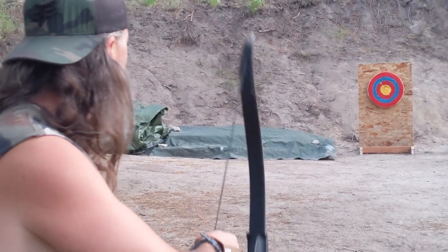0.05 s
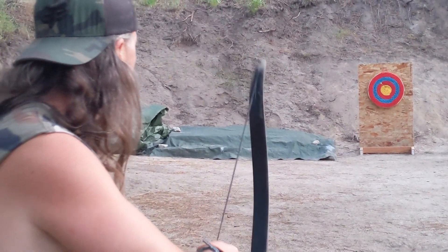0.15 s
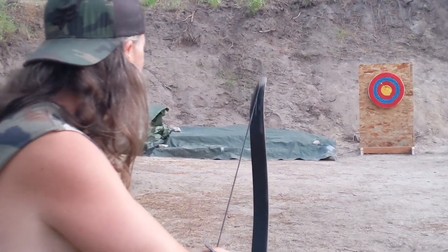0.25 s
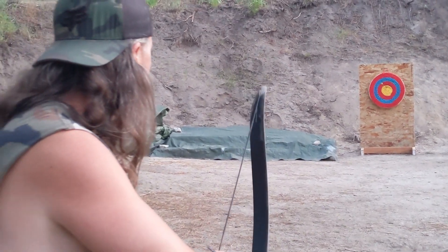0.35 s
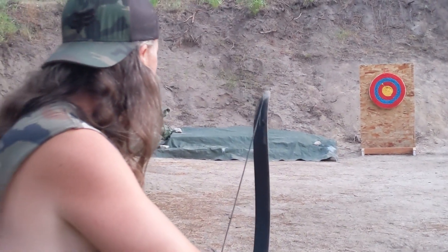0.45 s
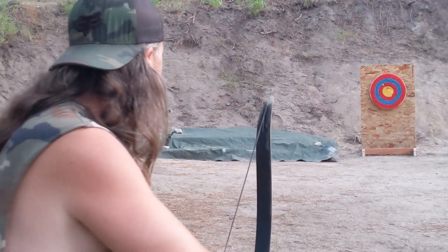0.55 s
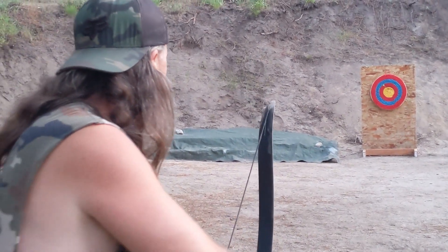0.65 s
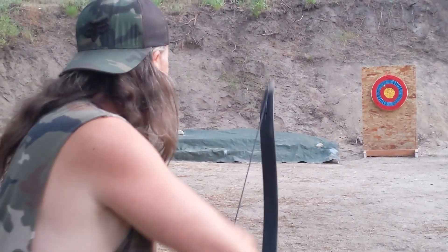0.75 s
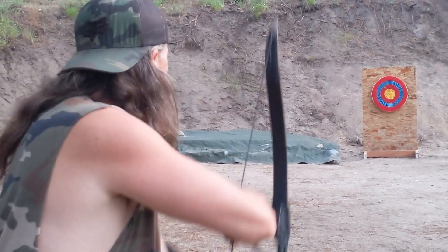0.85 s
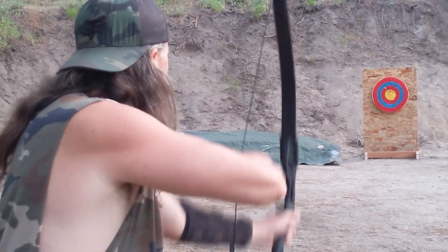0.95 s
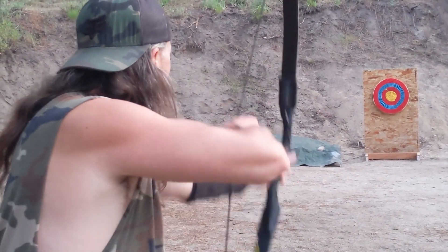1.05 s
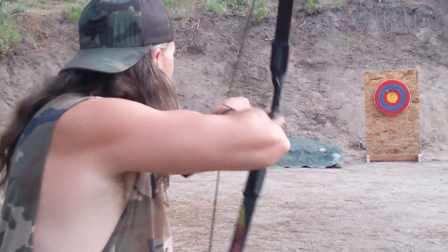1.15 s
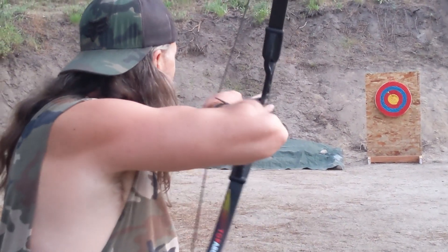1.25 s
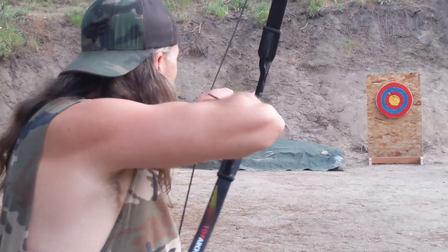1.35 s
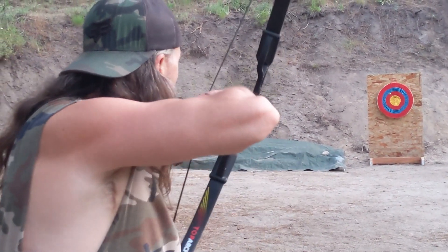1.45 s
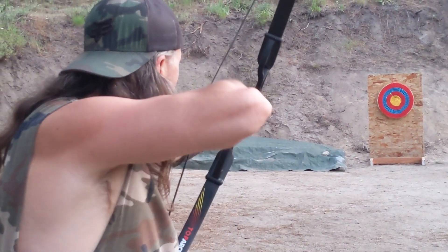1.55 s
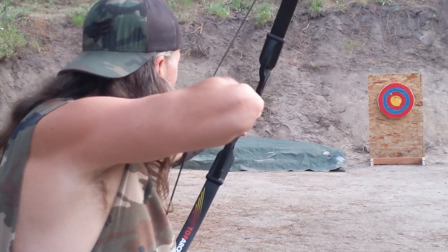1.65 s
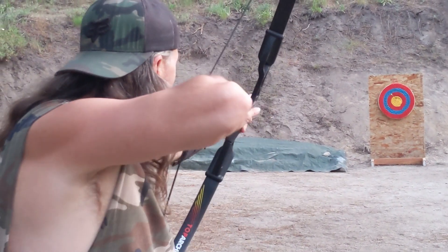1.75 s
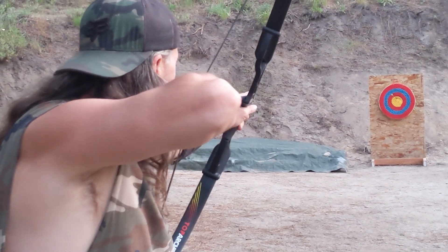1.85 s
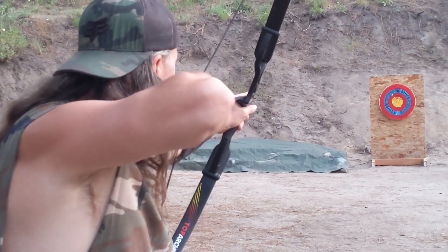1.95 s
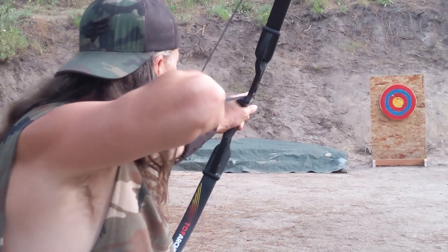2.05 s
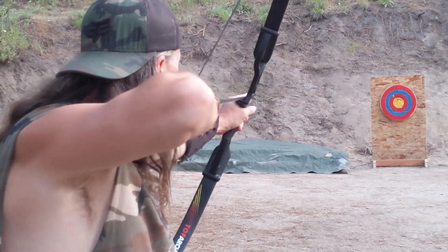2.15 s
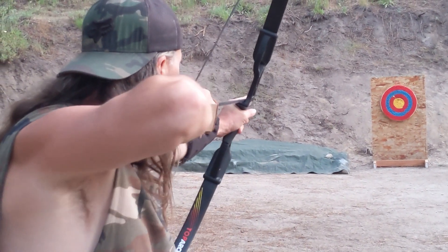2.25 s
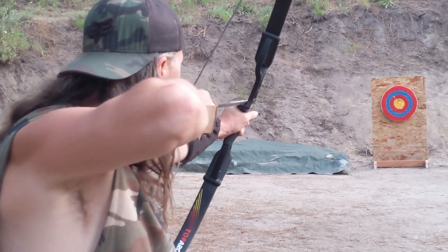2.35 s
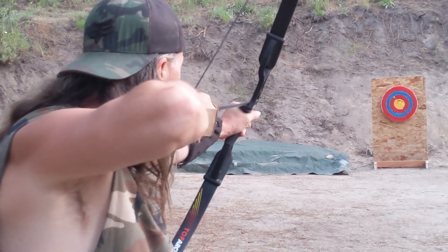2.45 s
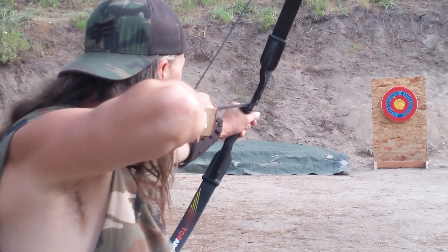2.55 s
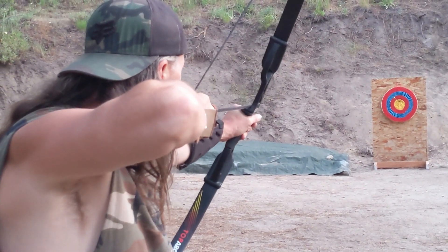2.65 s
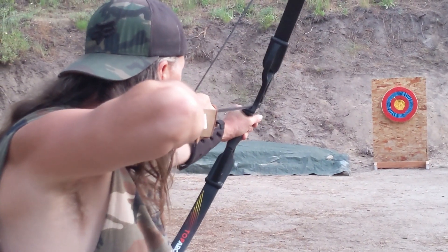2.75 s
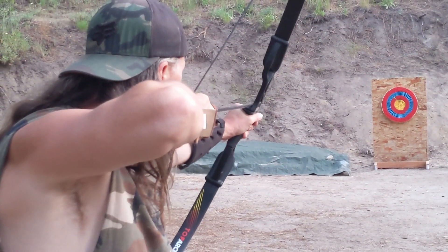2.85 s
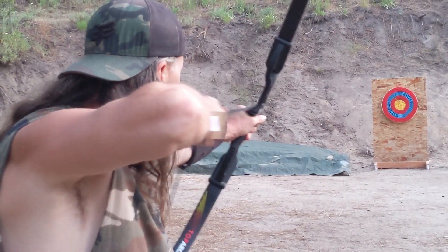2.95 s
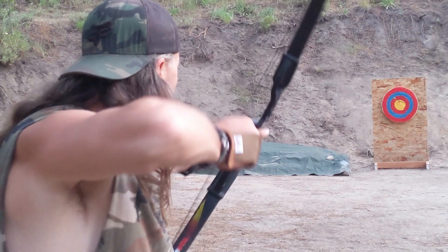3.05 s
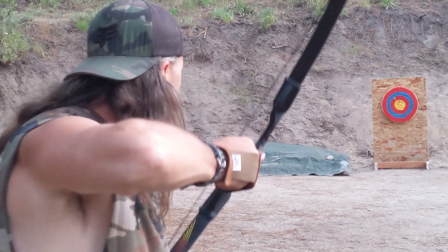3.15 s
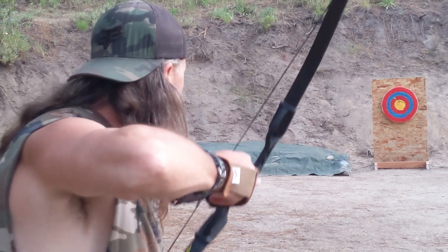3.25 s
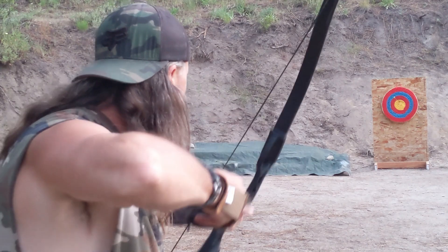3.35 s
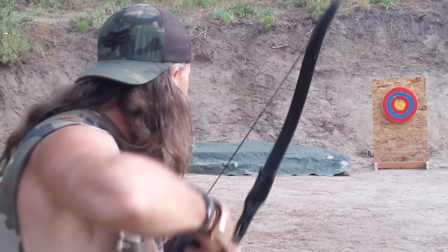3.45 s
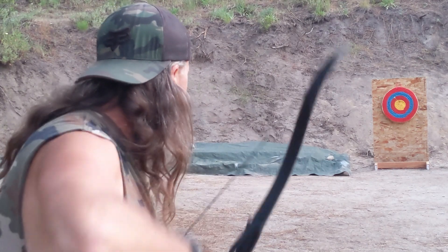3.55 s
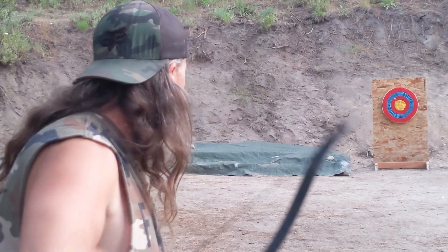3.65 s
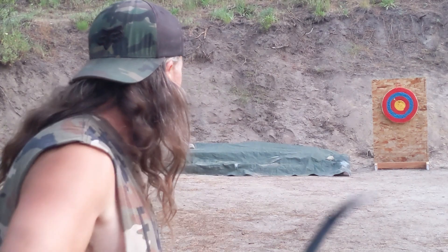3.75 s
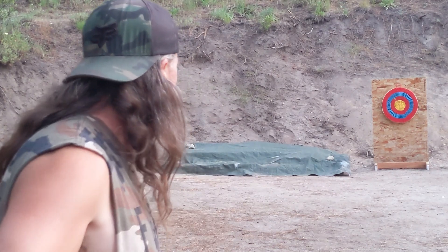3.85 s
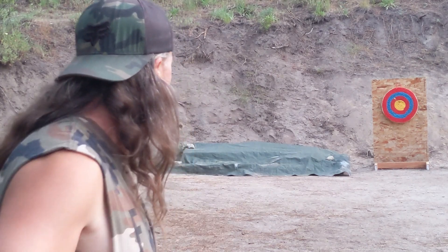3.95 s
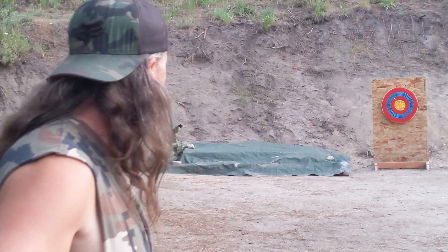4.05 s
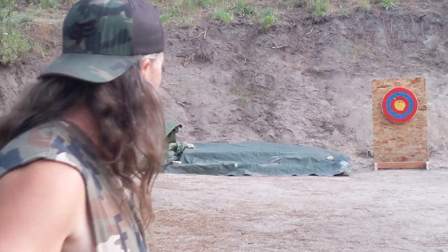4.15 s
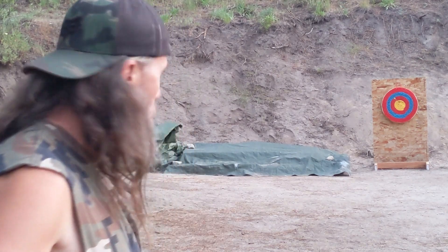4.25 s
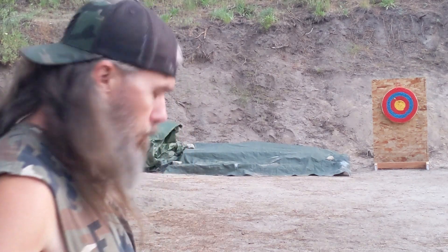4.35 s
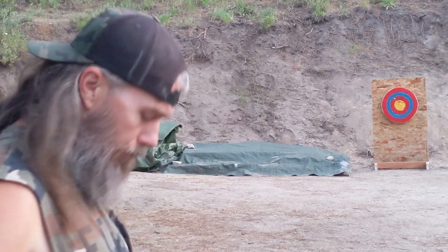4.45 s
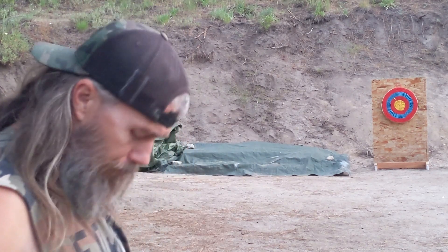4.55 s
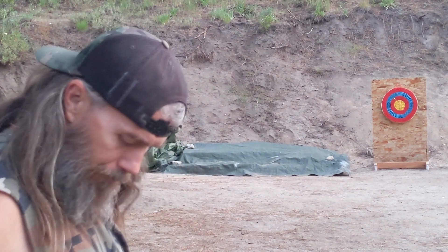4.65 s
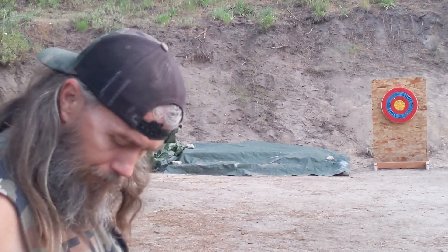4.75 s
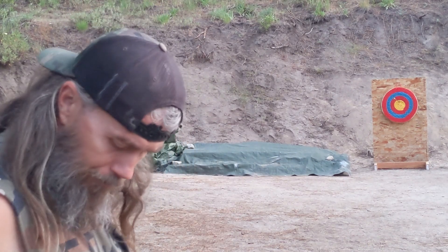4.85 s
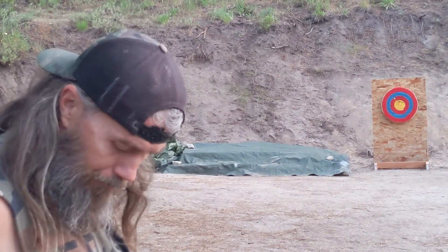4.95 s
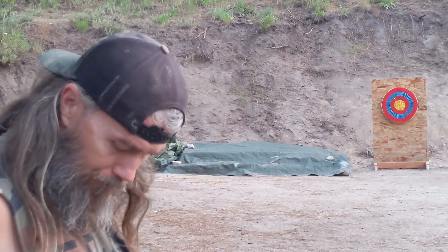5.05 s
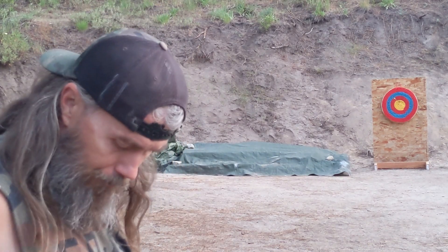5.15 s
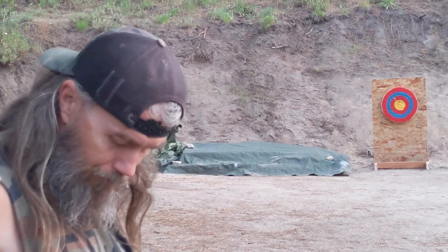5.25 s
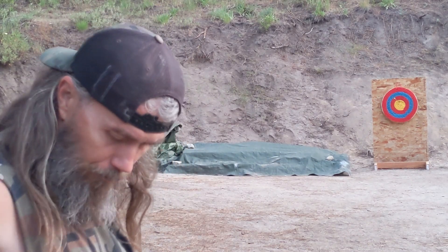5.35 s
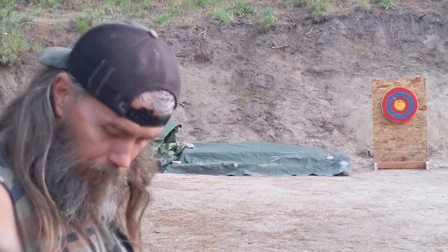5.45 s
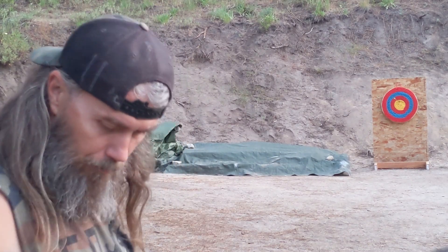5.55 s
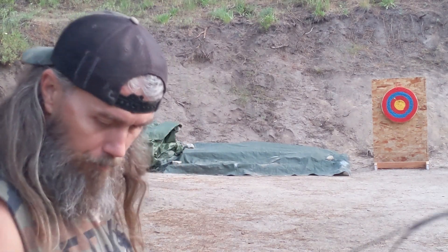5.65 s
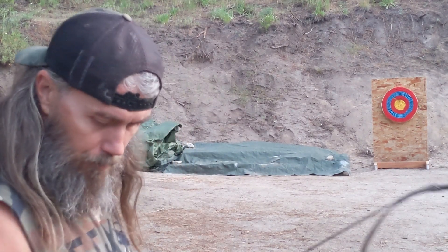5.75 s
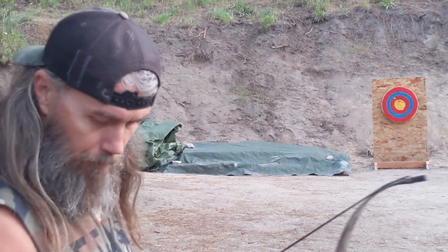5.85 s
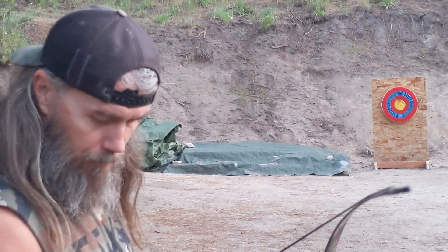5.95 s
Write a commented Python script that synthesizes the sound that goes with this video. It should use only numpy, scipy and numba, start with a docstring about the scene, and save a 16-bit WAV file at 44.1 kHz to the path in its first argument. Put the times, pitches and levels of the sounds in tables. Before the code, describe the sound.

Camera-style stereo pickup of an archery shot: quiet birds, faint hiss, soft wind thumps and regular fine motor clicks on the left. Midway, a sharp dry bow release with arrow rattle, close by, then a hard woody thwack further off with short shudder and open-air echo. Small rustles lead back to ticking and brighter bird trills and chirps.

```python
"""Birds whistle, trill and twitter (gliding sines) over low rumble with wind thumps and hiss (coloured noise).
A lens motor ticks mostly at the left (clicks ringing short modes); a low hum (narrow noise) swells once.
Three seconds in, an arrow scrapes and clacks on a bow close by (noise grains, pings, limb modes).
A third of a second later it hits a chipboard target in an earth pit: the board cracks and booms (modes
set ringing by contact pulses) and the banks echo (convolution with decaying noise bands)."""
import sys
import numpy as np
from scipy import signal
from scipy.fft import rfft, irfft, next_fast_len
from scipy.io import wavfile
from scipy.ndimage import uniform_filter1d
from numba import njit

SR = 44100
rng = np.random.default_rng(int(sys.argv[2]) if len(sys.argv) > 2 else 0)


def unload_audio(sound):
    """Save the sound as a 16-bit wav file, at the path given as the first command line argument."""
    columns = np.transpose(np.atleast_2d(sound))
    # keep every value between -1 and 1, then stretch to whole-number steps
    steps = np.round(np.clip(columns, -1, 1) * 32767)
    wavfile.write(sys.argv[1], SR, steps.astype(np.int16))


N = 264159


def undb(db):
    """Logarithmic level: decibels to an amplitude ratio."""
    return 10 ** (np.asarray(db) / 20)


def unit(x):
    """Normalisation to unit root-mean-square amplitude."""
    return x / np.sqrt(np.mean(x ** 2))


def curve(rows):
    """Linear interpolation: the columns of a breakpoint table as signals over time."""
    s, *columns = np.transpose(rows)
    t = np.arange(N) / SR
    return [np.interp(t, s, column) for column in columns]


def colour(x, points, sign=1, lag_ms=0.):
    """Linear filtering: (f/Hz, level/dB) points weight the spectrum, and a phase slope delays it."""
    size = next_fast_len(x.shape[-1])
    hz = np.arange(size // 2 + 1) * SR / size + 1e-3  # the offset keeps the logarithm finite
    f, db = np.transpose(points)
    gain = undb(sign * np.interp(np.log(hz), np.log(f), db))
    delay = np.exp(-2j * np.pi * hz * lag_ms / 1000)
    return irfft(rfft(x, size) * gain * delay, size)[..., :x.shape[-1]]


def ring(x, modes):
    """Modal superposition: a push excites damped sines, neighbours in opposite phase."""
    t = np.arange(SR // 2) / SR
    body = np.zeros(len(t))
    for k, (hz, db, t60) in enumerate(modes):
        decay = np.exp(-np.log(1000) * t / max(t60, 1e-3))  # no mode dies faster than 1 ms
        body += (-1) ** k * undb(db) * decay * np.sin(2 * np.pi * hz * t)
    return signal.fftconvolve(x, body)[:N]


def add(out, s, sound):
    """Superposition: mix a short sound in at s seconds."""
    i = int(s * SR)
    out[i:i + len(sound)] += sound[:N - i]


def push(ms):
    """Impulse of a soft contact: a smooth pulse of unit area, duller the longer it lasts."""
    shape = np.hanning(int(ms * SR / 1000) + 3)
    return shape / shape.sum()


def flicker(size, rate, depth_db):
    """Random amplitude modulation: a gain that wanders rate times a second."""
    k = int(SR / rate)
    held = np.repeat(rng.standard_normal(size // k + 1), k)
    return undb(depth_db * uniform_filter1d(held, k)[:size])


# Spectral density of the rumble: f/Hz, level/dB
RUMBLE_COLOUR = [(8.8, -25), (15, 1), (34, 8), (108, -6.5), (136, -7), (167, -15.5), (200, -15), (284, -40),
                 (700, -59), (910, -63.5), (1540, -120)]
# Course of the rumble: t/s, level below 60 Hz/dB, level above 60 Hz/dB, before the ports are tilted
RUMBLE = [(0, -67.5, -61), (.75, -68, -62.5), (1.45, -67.5, -63.5), (1.78, -58, -66), (2.2, -58.5, -67.5),
          (2.4, -65.5, -66), (2.55, -60, -67.5), (2.98, -58.5, -61), (3.75, -64.5, -67),
          (4.0, -62.5, -67.5), (4.45, -68, -67), (5.3, -58.5, -70.5), (5.99, -64, -67.5)]
# Spectral density of the microphone hiss: f/Hz, level/dB
HISS = [(150, -20.5), (250, 0.5), (373, -4), (407, -6.5), (468, -4.5), (510, -7.5), (557, -7),
        (1310, -15.5), (1420, -12.5), (1820, -18.5), (2670, -15.5), (4410, -15.5), (7440, -15.5),
        (13000, -20), (16000, -16)]
HISS_DB = -70.5  # before each microphone's own tilt


def air():
    """Partial coherence: low rumble with wind thumps, partly shared by the ports, over independent hiss."""
    common, left, right = (unit(colour(rng.standard_normal(N), RUMBLE_COLOUR)) for _ in range(3))
    unshared = colour(np.array([left, right]), [(40, -10.5), (130, -6.0), (300, 5.5)])
    both = common + unshared
    deep = signal.sosfiltfilt(signal.butter(2, 60, fs=SR, output="sos"), both)
    deep_db, low_db = curve(RUMBLE)
    rumble = unit(deep) * undb(deep_db) * flicker(N, 5., depth_db=3.0)
    rumble = rumble + unit(both - deep) * undb(low_db)
    hiss = unit(colour(rng.standard_normal((2, N)), HISS)) * undb(HISS_DB)
    left_hiss = colour(hiss[0], [(500, 0.82), (2400, 4.7), (5000, 3), (15000, 2.8)])
    right_hiss = colour(hiss[1], [(500, -2), (2400, 0.0), (5000, 2), (15000, -3)])
    return rumble * undb([[.8], [-.8]]) + np.array([left_hiss, right_hiss])


# One low hum: t/s, length/s, f/Hz, quarter of the span between band edges/Hz, level/dB
HUM = (3, .26, 150, 25, -56.5)


def hum():
    """Narrow-band noise: a low hum that swells and goes."""
    s, length, hz, width, db = HUM
    out, n = np.zeros(N), int(length * SR)
    band = [(hz - 2 * width, -40), (hz, 0), (hz + 2 * width, -40)]
    narrow = unit(colour(rng.standard_normal(SR), band))
    swell = np.sin(np.pi * span(length)) ** .5
    add(out, s, undb(db) * narrow[:n] * swell)
    return out


# Groups of motor steps, a long run and then pairs: t into the round/s, number of steps
MOTOR = [(0, 23), (.16, 2), (.32, 2), (.64, 2), (.96, 2), (1.28, 2)]
# Modes of the lens barrel: f/Hz, level/dB, t60/s
MOTOR_MODES = [(5940, -2, 0.0036), (7480, -5.5, 0.017), (9730, 8, 0.0028), (10240, 6, 0.0013),
               (11140, 1.5, 0.003), (13000, -11, 0.00087), (15300, 0, 0.0039)]
# Silence of the motor around the shot: start/s, end/s
MOTOR_PAUSE_S = (3.0, 3.8)
MOTOR_FIRST_S, MOTOR_ROUND_S, MOTOR_STEP_S = .2917, 1.6, .005
MOTOR_STRAY_S = 4.7053  # time of a lone step


def lens():
    """Impulse excitation: stepper clicks ring the lens barrel, 16 dB weaker at the right."""
    steps = np.zeros(2 * N)
    for start in np.arange(MOTOR_FIRST_S, N / SR, MOTOR_ROUND_S):
        for s, count in MOTOR:
            times = start + s + MOTOR_STEP_S * np.arange(count)
            steps[(times * SR).astype(int)] = 1
    steps[int(MOTOR_PAUSE_S[0] * SR):int(MOTOR_PAUSE_S[1] * SR)] = 0
    steps[int(MOTOR_STRAY_S * SR)] = 1
    strength = undb(-57.5 + 0.5 * rng.standard_normal(N))
    return ring(steps[:N] * strength, MOTOR_MODES) * undb([[0], [-16]])


def slur(hz0, hz1, ms):
    """Frequency glide: a short sine sliding from one pitch to another."""
    n = int(ms * SR / 1000)
    return np.hanning(n) * np.sin(2 * np.pi * np.cumsum(np.geomspace(hz0, hz1, n)) / SR)


# Bouts of far twitter: start t/s, level peak t/s (may precede the start), end t/s, centre f/Hz,
# level/dB of each of two equal parts (calls and smear) before a 7.5 dB cut
TWITTER = [(0.5, 0.84, 1.6, 3500, -75), (1.7, 2.11, 2.45, 3500, -77), (2.7, 2.6, 4.1, 10000, -75.5),
           (4, 5.12, 5.8, 3500, -75.5), (0, 1.02, 2.2, 5650, -73), (1.6, 2.17, 2.64, 5650, -74),
           (2.8, 3.05, 4.0, 5650, -71.5), (4.35, 4.55, 4.8, 5650, -74), (4.6, 4.97, 5.8, 5650, -74),
           (0.2, 1.42, 1.9, 7500, -70), (1.5, 1.9, 2.9, 7500, -76), (3, 4.0, 4.9, 7500, -77),
           (4.9, 5.3, 5.99, 7500, -76), (.6, 1.02, 1.65, 9800, -70), (4.3, 4.52, 4.75, 9800, -82)]
TWITTER_SPREAD_HZ, TWITTER_FADE_DB = 520., 11.5  # pitch scatter; level drop away from the peak


def twitter():
    """Random superposition: showers of far chips swell and fade, or only fade; leaves smear them."""
    out, spread_hz = np.zeros(N), TWITTER_SPREAD_HZ
    for start, peak, end, hz, db in TWITTER:
        when = rng.random(700) * N / SR
        chance, noise = rng.standard_normal((700, 2)), rng.standard_normal(N)
        start, end = max(start, 0), min(end, N / SR)
        t = np.arange(start, end, 1 / SR)
        far = np.zeros(N)
        for s, (pitch, glide) in zip(when, chance):
            if start < s < end:
                f = hz + spread_hz * pitch
                add(far, s - start, slur(f, f * (.97 + 0.05 * glide), ms=9))
        band = [(hz - 1.4 * spread_hz, -30), (hz - spread_hz, 0),
                (hz + spread_hz, 0), (hz + 1.7 * spread_hz, -30)]
        smear = colour(noise[:len(t)], band)
        edge_db = db - TWITTER_FADE_DB
        level = undb(np.interp(t, [start, peak, end], [edge_db, db, edge_db]))
        mix = undb(-7.5) * unit(far[:len(t)]) + undb(-7.5) * unit(smear)
        add(out, start, mix * level)
    return out


TURN_AT, SLOWING = 0.59, .02  # as shares of a series


def series(rows, gap_s):
    """Quasi-periodic repetition: time, level and two chance draws for each note of a series."""
    for first, last, *db in rows:
        u = np.linspace(0, 1, round((last - first) / gap_s) + 1)
        times = first + (last - first) * (u + SLOWING * u * (u - 1))
        levels = np.interp(u, [0, TURN_AT, 1], db)
        yield from zip(times, levels, rng.standard_normal((len(u), 2)))


# Four kinds of note series, of which some swell and the low chatter fades:
# first t/s, last t/s, first level/dB, level 0.59 of the way through/dB, last level/dB
TRILLS = [(.1474, .789, -69.5, -66, -68.5), (4.4967, 5.1432, -63.5, -60.5, -68.5)]  # falling slurs
BURRS = [(4.463, 4.93, -68, -67.5, -69.5)]  # each note a flutter of three high chips
CHIPS = [(4.9668, 5.5354, -68, -63, -67)]  # single high chips
CHATTER = [(2.8674, 3.0325, -73, -74, -74), (4.8594, 5.4494, -66.5, -71.5, -75)]  # low chips in answering pairs
TRILL_GAP_S, BURR_GAP_S, CHIP_GAP_S, CHATTER_GAP_S, FLUTTER_GAP_S = .0585, .0585, .038, .04, .008
CHIP_HZ, CHIP_SPREAD_HZ, CHATTER_HZ, CHATTER_SPREAD_HZ = 5780, 120., 3800, 120
TRILL_UNEVEN_DB, UNEVEN_DB = 0.6, 1.5  # scatter of level from note to note


def trills():
    """Repeated frequency glides: trills of slurs, and runs of high and low chips that vary a little."""
    out = np.zeros(N)
    # notes start slightly ahead of their listed times
    for s, db, (pitch, size) in series(TRILLS, TRILL_GAP_S):
        note = slur(hz0=5100, hz1=3650 + 60 * pitch, ms=27)
        add(out, s - .006, undb(db + TRILL_UNEVEN_DB * size) * note)
    flutter = [(s + FLUTTER_GAP_S * k, db, chance)
               for s, db, chance in series(BURRS, BURR_GAP_S) for k in range(3)]
    for s, db, (pitch, size) in flutter + list(series(CHIPS, CHIP_GAP_S)):
        hz = CHIP_HZ + CHIP_SPREAD_HZ * pitch
        add(out, s - .001, undb(db + UNEVEN_DB * size) * slur(1.07 * hz, 0.903 * hz, ms=4.5))
    for s, db, (pitch, size) in series(CHATTER, CHATTER_GAP_S):
        hz = CHATTER_HZ + CHATTER_SPREAD_HZ * pitch
        add(out, s - .002, undb(db + UNEVEN_DB * size) * slur(1.06 * hz, .94 * hz, ms=14))
        answer = slur(.97 * hz, .86 * hz, ms=12)  # lower, between the chips
        add(out, s + CHATTER_GAP_S / 2, undb(db - 3.0) * answer)
    return out


def whistle(hz, db):
    """Frequency-modulated oscillator: a near-sine on a pitch and level track, with soft edges."""
    i = np.arange(len(hz))
    edge = np.clip(np.minimum(i, i[::-1]) / SR / 0.0029, 0, 1)
    tone = np.sin(2 * np.pi * np.cumsum(hz) / SR)
    return edge * flicker(len(hz), 184.0, depth_db=2.5) * undb(db) * tone


def span(length_s):
    """Normalised time: progress from 0 to 1 over a note."""
    return np.linspace(0, 1, int(length_s * SR))


# Straight whistles: t/s, length/s, first f/Hz, last f/Hz, first level/dB, last level/dB
GLIDES = [(0.029, 0.071, 3470, 3416, -71, -65), (1.998, 0.036, 3870, 3650, -71, -76),
          (2.298, 0.047, 5030, 5260, -74, -69.5), (2.338, 0.052, 5300, 3450, -76, -80),
          (2.833, 0.028, 3570, 4020, -77, -66.5), (4.379, 0.072, 3426, 3540, -68, -69),
          (4.806, 0.048, 4170, 3970, -67, -54.5), (4.852, 0.014, 4080, 2800, -64, -66.5)]
# Falling notes: t/s, level/dB
FALLS = [(1.055, -75), (1.272, -75), (1.495, -74)]
# Voice break on the way down: share of the fall, relative level/dB
FALL_BREAK = [(.5, 0), (.68, -12), (.82, -1)]
FALL_S, FALL_FROM_HZ, FALL_TO_HZ, FALL_BEND = .046, 4720, 3720, 1.6  # bend above 1: the fall steepens
# Arched notes: t/s, length/s, level at the top/dB, warble depth at the top/Hz
ARCHES = [(1.108, .045, -68, 30.), (1.326, 0.057, -65, 400.), (1.565, .045, -63, 29.9)]
ARCH_FOOT_HZ, ARCH_TOP_HZ, ARCH_FOOT_DB, WARBLE_HZ = 4370, 5850, -11.5, 130
# Hooked notes: t/s, level/dB
HOOKS = [(1.71, -62.5), (1.875, -61.5)]
# Level course of a hook: t into the hook/s, relative level/dB
HOOK_LEVEL = [(0, -16), (.02, 1), (.043, -14), (.075, -6.5)]
HOOK_S, HOOK_FROM_HZ, HOOK_TO_HZ, HOOK_SETTLE_S = .075, 8200, 4330, .019


def song():
    """Frequency modulation: whistled glides, three falls answered by three arches, then two hooks."""
    out = np.zeros(N)
    for s, length, hz0, hz1, db0, db1 in GLIDES:
        u = span(length)
        add(out, s, whistle(hz0 + (hz1 - hz0) * u, db0 + (db1 - db0) * u))
    u = span(FALL_S)
    fall_hz = FALL_FROM_HZ + (FALL_TO_HZ - FALL_FROM_HZ) * u ** FALL_BEND
    break_db = np.interp(u, *np.transpose(FALL_BREAK))
    for s, db in FALLS:
        add(out, s, whistle(fall_hz, db + break_db))
    for s, length, db, warble_depth_hz in ARCHES:
        u = span(length)
        up = np.sin(np.pi * u)
        warble = warble_depth_hz * np.sin(2 * np.pi * WARBLE_HZ * length * u)
        hz = ARCH_FOOT_HZ + up * (ARCH_TOP_HZ - ARCH_FOOT_HZ + warble)
        add(out, s, whistle(hz, db + ARCH_FOOT_DB * (1 - up)))
    t = span(HOOK_S) * HOOK_S
    hook_hz = HOOK_TO_HZ + (HOOK_FROM_HZ - HOOK_TO_HZ) * np.exp(-t / HOOK_SETTLE_S)
    hook_db = np.interp(t, *np.transpose(HOOK_LEVEL))
    for s, db in HOOKS:
        add(out, s, whistle(hook_hz, db + hook_db))
    return out


def birds():
    """Superposition of independent sources: all the birds together."""
    return song() + trills() + twitter()


# Decay of the echo tail by band: f/Hz, level/dB, t60/s
BANKS = [(74.6, 9, .35), (120, 22.5, 0.42), (221.1, 21.5, 0.44), (410, 1, 0.78), (797, -2, 0.88),
         (1474, -8, 0.48), (2273, -4, 0.38), (2650, -4, 0.85), (3750, -1.5, 0.68), (5230, -9, 0.35),
         (7500, -9.5, 0.39), (10310, -16, 0.3), (14500, -17.5, 0.26)]


def banks(x):
    """Diffuse reverberation: banks and trees scatter a tail, each band with its own decay rate."""
    t = np.arange(SR) / SR
    common, left, right = rng.standard_normal((3, SR))
    tail = 0
    for k, (hz, db, t60) in enumerate(BANKS):
        alike = np.clip(120 / hz, 0, 1) ** .5  # left and right differ more towards the treble
        noise = alike * common + np.sqrt(1 - alike ** 2) * np.array([left, right])
        shape = [(f, -12 * (j - k) ** 2) for j, (f, _, _) in enumerate(BANKS)]
        band = undb(db) * colour(noise, shape) * flicker(SR, 120., depth_db=2.1)
        tail = tail + band * np.exp(-np.log(1000) * t / t60)
    tail = tail * undb(-18.0) * np.clip(t / 0.0053, 0, 1)  # first echoes need time to return
    return signal.fftconvolve(x, tail, axes=1)[:, :N]


# Soft rustles before and after the shot: t/s, level before colouring/dB, length/ms
RUSTLES = [(2.999, -61.5, 10), (3.787, -48, 13.8), (4.08, -63, 59), (4.31, -68.5, 32)]
# Spectral density of the rustles: f/Hz, level/dB
RUSTLE_COLOUR = [(200, -6.5), (500, 1.5), (1500, -4.5), (2300, -6), (3200, -5), (5000, -22.5), (9000, -14)]


def rustles():
    """Broadband friction noise: short soft bursts of cloth and leather."""
    out = np.zeros(N)
    for (s, db, ms), hiss in zip(RUSTLES, rng.standard_normal((len(RUSTLES), 4000))):
        n = int(ms * SR / 1000)
        swell = np.sin(np.pi * np.linspace(0, 1, n) ** 0.68)
        add(out, s, undb(db) * swell * hiss[:n])
    return colour(out * flicker(N, 340.0, depth_db=5.5), RUSTLE_COLOUR)


# Arrow sliding over the rest: t/s, scrape level before colouring/dB, level of limb shaking/dB
SLIDE = [(3.058, -75, -100.5), (3.066, -52, -88.5), (3.069, -37, -79.5), (3.087, -33, -78),
         (3.097, -22, -56), (3.111, -21, -54.5), (3.136, -30, -68), (3.152, -45, -73.5), (3.27, -78, -97.5)]
# Spectral density of the scrape: f/Hz, level/dB
SLIDE_COLOUR = [(290, -38.5), (500, -12), (829, 0.5), (1140, -9.5), (1300, -8.5), (1630, -5), (2060, -9),
                (3470, -6), (4630, -16), (5190, -10.5), (8370, -14.5), (11700, -9.5), (15800, -17)]
# Shaft and string clacking on the bow: t/s, ping level/dB, thump level/dB, ping f/Hz, contact/ms
CLACKS = [(3.068, -46, -69.5, 2520, .3), (3.079, -26.5, -66.5, 7600, .3), (3.081, -35.5, -55, 2780, 0.41),
          (3.086, -31, -44.5, 7000, 0.26), (3.088, -62.5, -18.5, 11290, 4.61),
          (3.098, -62, -28, 8980, 0.45), (3.104, -40.5, -34.5, 3000, 0.24), (3.109, -39, -29, 5080, 0.4),
          (3.116, -30.5, -59, 5200, .3), (3.135, -37, -37.5, 3270, 0.74), (3.322, -59, -79.5, 657, .3)]
# Modes of the bow limbs: f/Hz, level/dB, t60/s
BOW = [(155.6, -22, 0.66), (199, 3, 0.014), (343.6, -1.5, 0.062), (401, -10, .25), (520, -7.5, 0.068),
       (647.4, -13, 0.19), (796, -0.5, 0.018), (931, -8, 0.053), (1356, -13.5, 0.071), (1586, -8.5, 0.044),
       (2340, -13.5, .03)]
# Share of the scrape that differs between the ports: f/Hz, level/dB
UNLIKE = [(500, -24.5), (2500, -4.5), (8000, -2)]


def bow():
    """Stick-slip friction and forced vibration: grains scrape, clacks ping, and both shake the limbs.

    Returns the bow sound and the part of the scrape that differs between the ports."""
    grain_db = 1.4 * np.repeat(rng.exponential(size=N // 40 + 1), 40)[:N]  # a new level every 40 samples
    grains = rng.standard_normal((2, N)) * undb(grain_db)
    t = np.arange(N) / SR
    scrape_db, shake_db = curve(SLIDE)
    moving = unit(grains) * (t > SLIDE[0][0]) * (t < SLIDE[-1][0])
    scrape, other = colour(moving * undb(scrape_db), SLIDE_COLOUR)
    pings, pushes = np.zeros(N), np.zeros(N)
    short = t[:600]
    for s, ping_db, thump_db, hz, ms in CLACKS:
        add(pings, s, undb(ping_db) * np.exp(-short * hz / 8) * np.sin(2 * np.pi * hz * short))
        add(pushes, s, -undb(thump_db) * push(ms))
    limbs = ring(pushes + undb(shake_db) * moving[0], BOW)
    return scrape + pings + limbs, colour(other, UNLIKE)


# The point bites in, then shaft and board shake: t/s, crack level/dB, thump level/dB, thump contact/ms
KNOCKS = [(3.408, -16.5, -20, 0.44), (3.409, -18, -37.5, 1.7), (3.4103, -20.5, -39, 0.53),
          (3.438, -37.5, -28, 3.2), (3.452, -41, -26, 5.2), (3.474, -39, -41.5, 3), (3.492, -38, -29, 4.53),
          (3.506, -54, -27.5, 7.6), (3.533, -60, -32, 8)]
# Modes of the board: f/Hz, level/dB, t60/s
BOARD = [(84, -14, 0.59), (125, -10.5, 0.16), (172, -6.5, 0.057), (204.5, -0.5, .12), (239.9, 8, 0.065),
         (380, -9.5, 0.042), (499, -16, 0.0078), (725, 0, .05), (869.5, -3, 0.035), (1087, -13, 0.09),
         (1320, -26.5, .04), (1635, -3.5, 0.04)]
# Modes of the snapping fibres: f/Hz, level/dB, t60/s
CRACK = [(1440, 0, 0.0083), (2834, -5.5, 0.0089), (3540, 2.5, 0.008), (4510, -4, 0.0051),
         (5220, -14, 0.036), (7360, -11, 0.01), (9850, -2, 0.0031), (11440, -15.5, 0.0092),
         (14200, -9.5, .004), (15500, -9, .003)]


def target():
    """Modal impact: the point cracks into the board, which booms; also a bare impulse for the banks."""
    cracks, pushes = np.zeros(N), np.zeros(N)
    for s, crack_db, thump_db, ms in KNOCKS:
        add(cracks, s, undb(crack_db) * push(ms / 10))
        add(pushes, s, -undb(thump_db) * push(ms))  # the face first moves away
    bang = np.zeros(N)
    add(bang, KNOCKS[0][0], np.array([1.]))  # the first blow only
    return ring(cracks, CRACK) + ring(pushes, BOARD), bang


# Colour of the port pair, the left facing the range: f/Hz, left minus right level/dB
EARS = [(60, 2), (110, 3), (200, 3), (380, 4.5), (700, 5), (1290, 9), (2380, 6.5), (4400, 11.5), (8120, 11),
        (15000, 5.5)]
BASS_LAG_MS, BASS_LAG_HZ = 0.61, 426  # low tones reach the left port later still


def ports(x, lag_ms, spread_db=0.):
    """Interaural differences: two ports hear their own colour and level, the left a little later."""
    half = [(f, db / 2) for f, db in EARS]
    hz = np.linspace(0, SR / 2, next_fast_len(N) // 2 + 1)
    lag_ms = lag_ms + BASS_LAG_MS / (1 + (hz / BASS_LAG_HZ) ** 2)
    left = undb(spread_db) * colour(x, half, lag_ms=lag_ms)
    right = colour(x, half, sign=-1) / undb(spread_db)
    return np.array([left, right])


def scene():
    """Direct and reflected sound: bow near, target and birds further off, echoes from the banks."""
    hit, bang = target()
    shot, unlike = bow()
    near = ports(shot + rustles(), lag_ms=.04)
    near = near + ports(unlike, lag_ms=0.) * [[1], [-1]]
    far = ports(hit, lag_ms=0.075)
    calls = ports(birds(), lag_ms=.05, spread_db=1)
    # bow and birds echo with little bass, the bang with its whole spectrum
    thin = colour(undb(-27.5) * near + undb(-16) * calls, [(200, -19.5), (1500, -5.5)])
    echoes = banks(thin + ports(undb(-13.5) * bang, lag_ms=0.))
    return near + far + calls + hum() + echoes + lens() + air()


@njit
def follow(x, attack, release):
    """Envelope detection: rises fast and falls slowly."""
    out, e = np.empty(len(x)), 0.
    for i in range(len(x)):
        e += (x[i] - e) * (attack if x[i] > e else release)
        out[i] = e
    return out


TOP_HZ = 15900


def record(dry):
    """Dynamic compression and band limiting: gain ducks after loud sounds, a low-pass cuts the top."""
    loud = follow(np.abs(dry).max(axis=0), 1 / (.01 * SR), 1 / (.3 * SR))  # 10 ms up, 300 ms down
    ducked = dry * (1 + loud / undb(-33.5)) ** -.2
    return signal.sosfilt(signal.ellip(10, .2, 60, TOP_HZ, fs=SR, output="sos"), ducked)


dry = scene()
out = record(dry)
unload_audio(out)
```